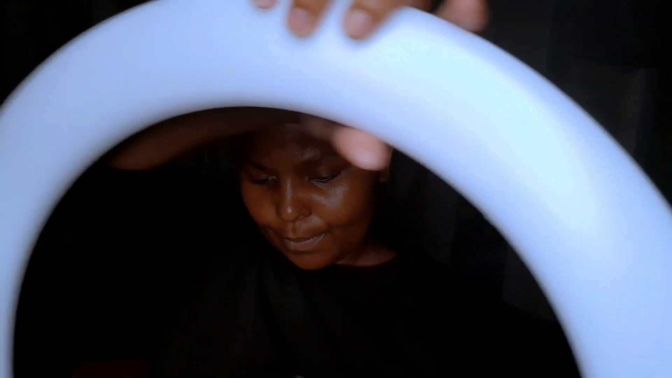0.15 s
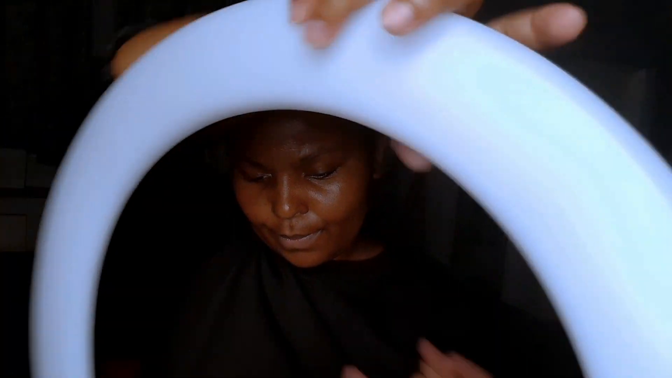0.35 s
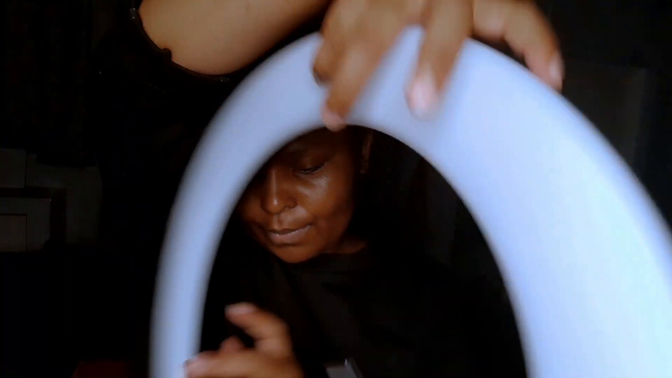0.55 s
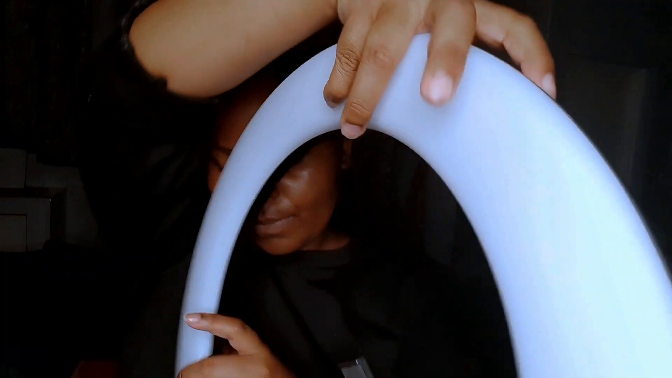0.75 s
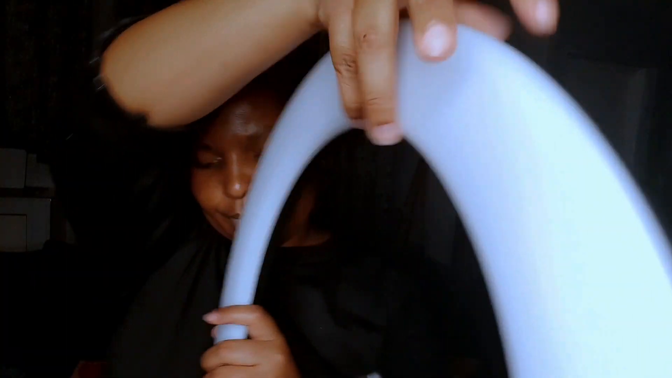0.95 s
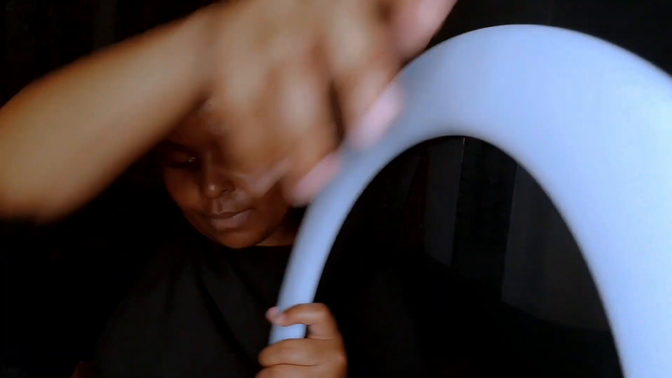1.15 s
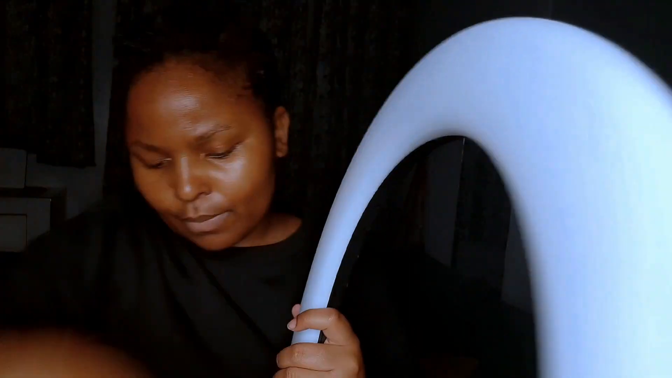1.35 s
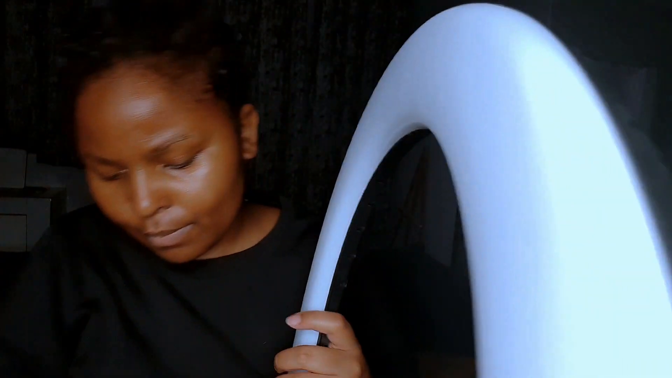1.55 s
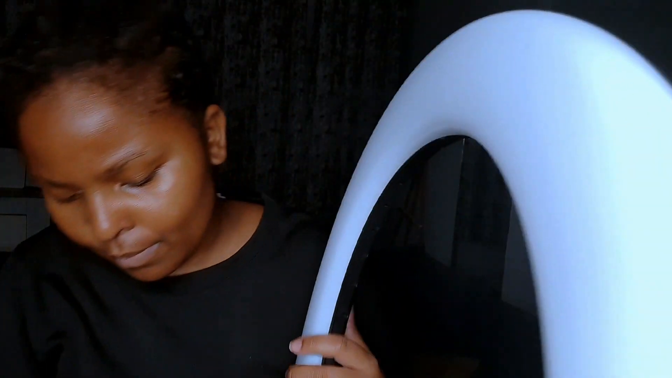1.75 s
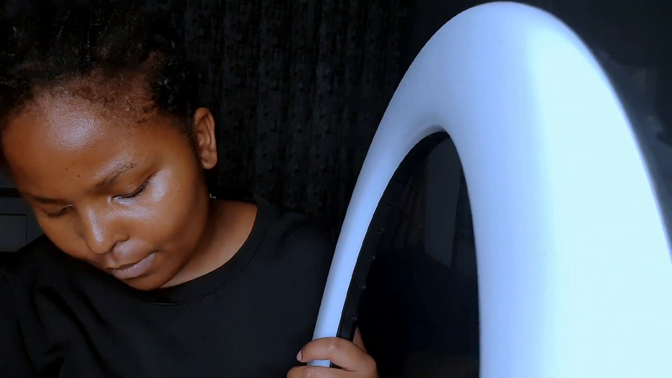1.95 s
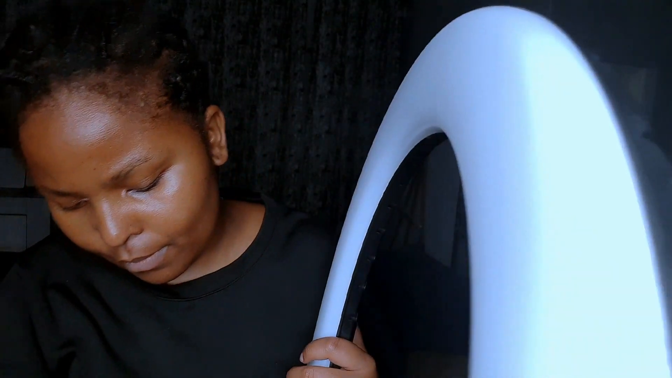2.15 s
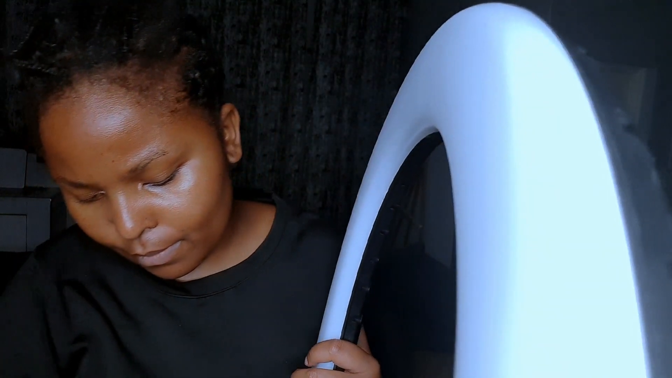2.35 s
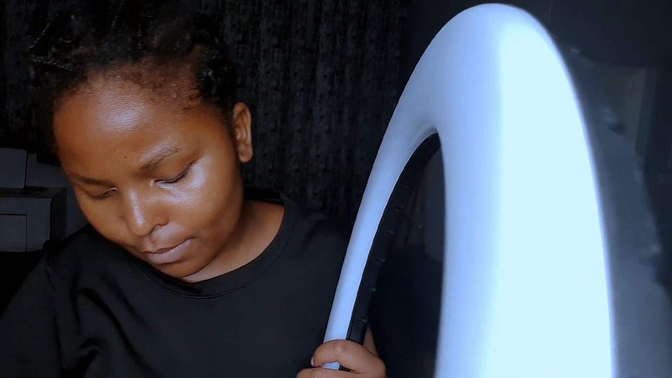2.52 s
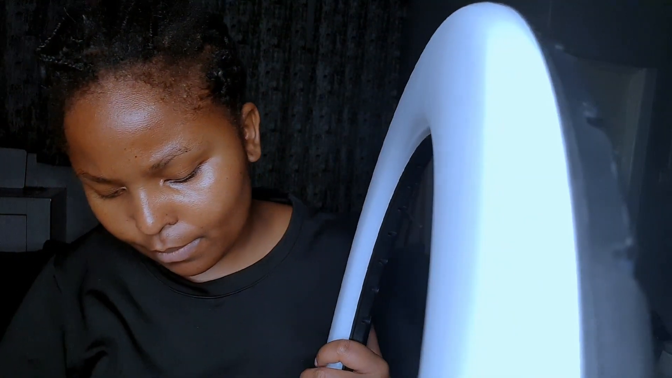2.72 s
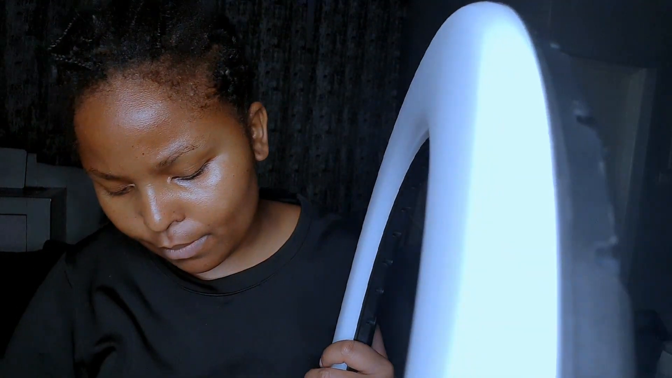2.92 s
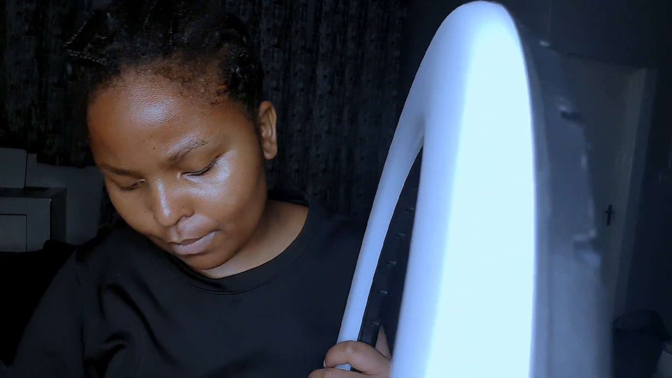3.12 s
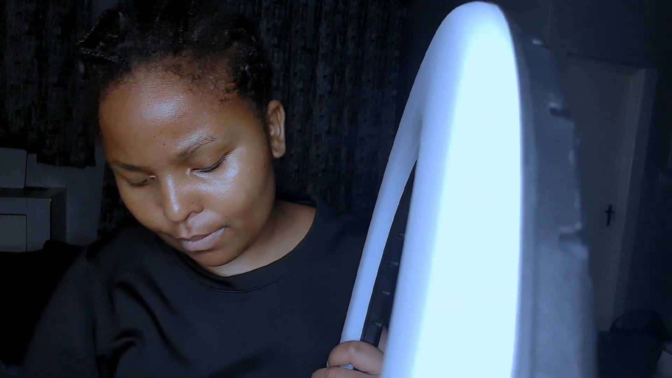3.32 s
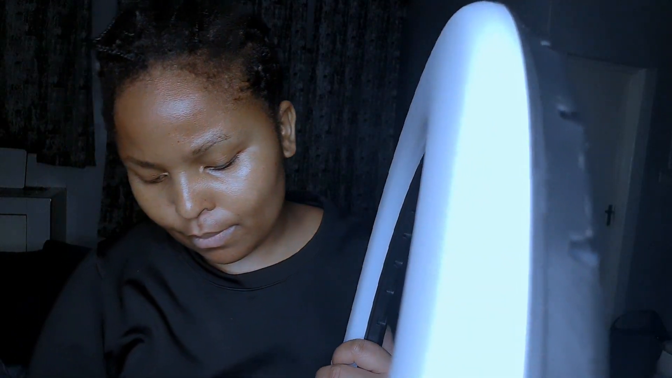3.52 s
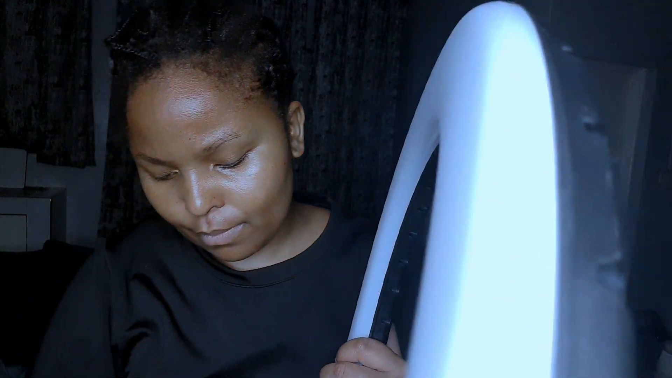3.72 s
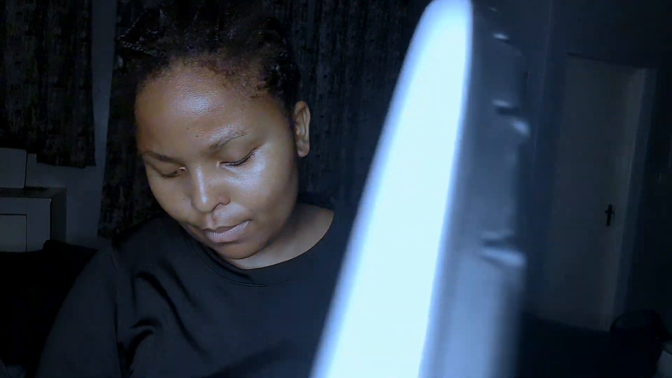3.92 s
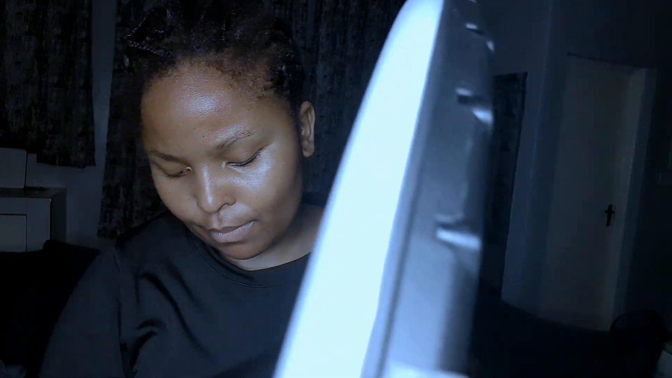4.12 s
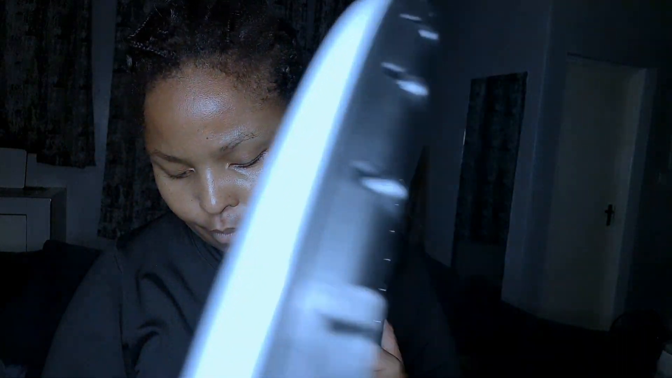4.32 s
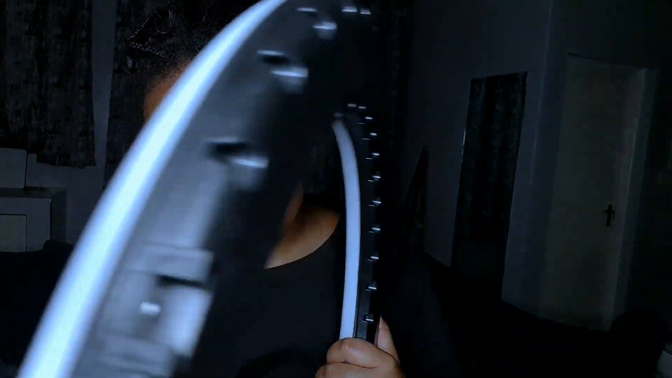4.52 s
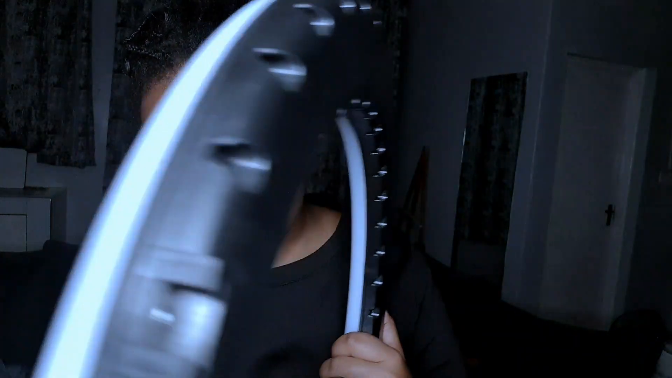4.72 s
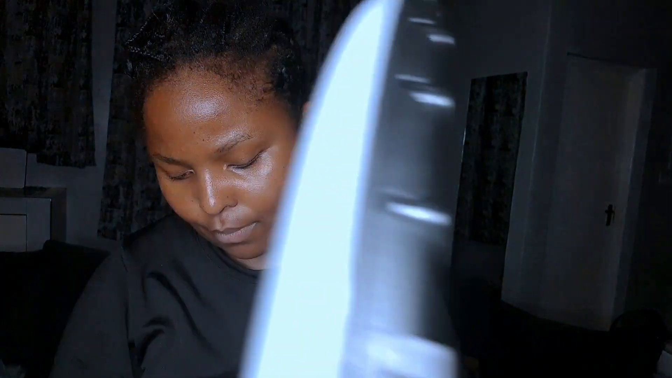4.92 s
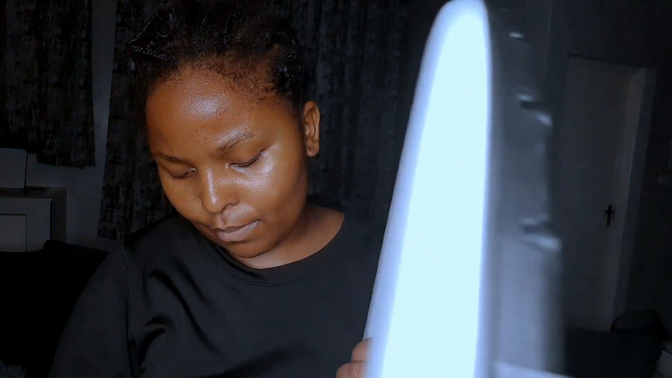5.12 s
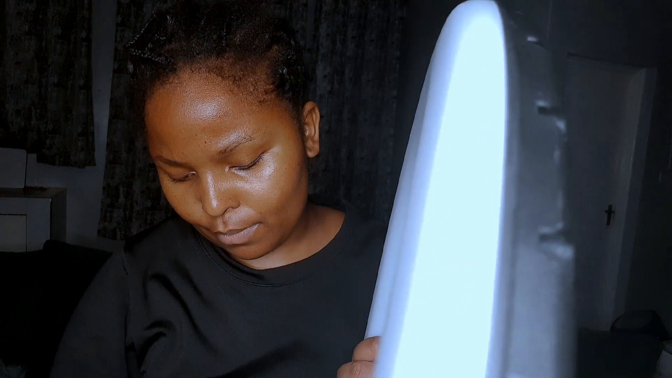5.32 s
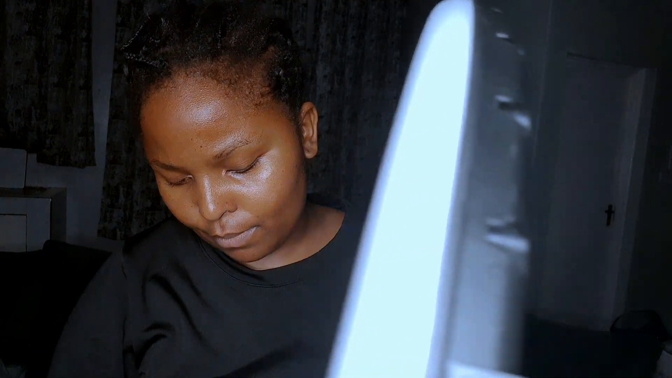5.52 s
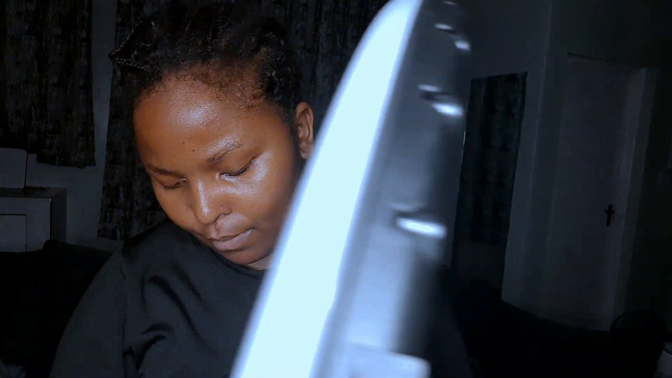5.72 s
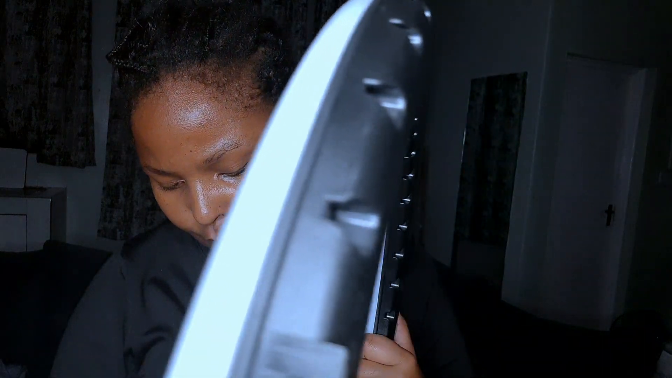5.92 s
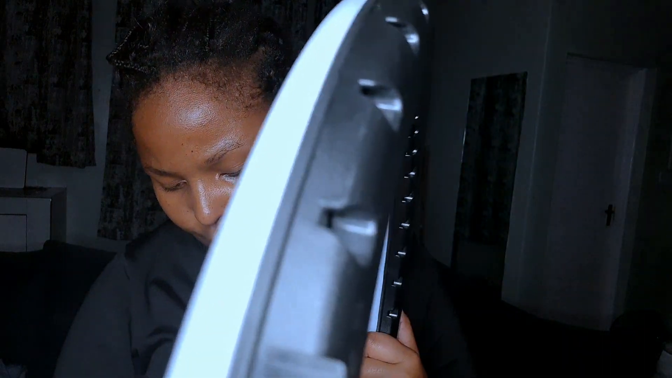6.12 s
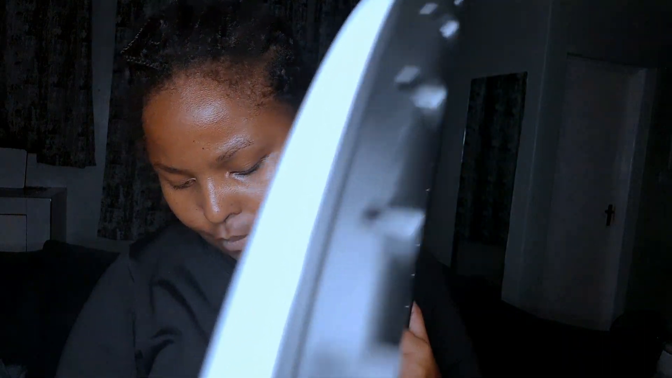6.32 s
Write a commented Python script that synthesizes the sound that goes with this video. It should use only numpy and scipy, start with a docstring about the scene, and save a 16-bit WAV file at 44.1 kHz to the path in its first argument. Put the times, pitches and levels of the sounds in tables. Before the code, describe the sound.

A light plastic hoop is handled right beside the microphone. Dry, short, hollow clicks and thuds come irregularly, with brief finger scrapes between them, thinning out after two and a half seconds. After a pause the joint ticks and the shell rattles twice, the second burst sharpest. Soft fumbling and a tiny fingertip squeak end it. Beneath lie a constant low mains hum, soft hiss and a very faint high whine.

```python
"""Knocks and rattles: a plastic ring light is gripped and swivelled on its stand in a small room.
Each contact rings the hollow housing's modes plus a dense noise clatter, shaped by hardness in four bands.
Fingers rub and creak over the shell (trains of tiny jerks), the joint ticks (decaying tones) and a
fingertip squeaks (coloured noise). Underneath: a two-tone mains hum; whine, rumble and hiss as noise."""
import sys
import numpy as np
from scipy import signal
from scipy.fft import rfft, irfft, next_fast_len
from scipy.io import wavfile
from scipy.ndimage import map_coordinates

SR = 44100
rng = np.random.default_rng(int(sys.argv[2]) if len(sys.argv) > 2 else 0)


def put_to_file(sound):
    """Save the sound as 16-bit audio at rate SR, in the file named by the first command-line argument."""
    columns = np.atleast_2d(sound).T  # one column per channel
    safe = np.clip(columns, -1, 1)
    whole_steps = np.round(safe * 32767)
    wavfile.write(sys.argv[1], SR, whole_steps.astype(np.int16))


N = 280564

# contacts on the housing: [t/s, relative ring level/dB, thud re ring/dB, clack re ring/dB,
# resonance of the struck spot f/Hz, hardness/0-1]
KNOCKS = [(0.039, -22, -15, -11, 650, .6), (0.0546, -16, -29, -7.5, 523, 0.07),
          (0.063, -20, -27, -25, 1030, 0.5), (0.07, -18.5, -11.5, -11, 760, 0.4),
          (0.081, -21.5, -19, -9, 1050, 0.45), (0.37, -34.5, -3.5, -34, 950, 0.2),
          (0.451, -23.5, -13, -21, 1210, 0.6), (0.495, -39.5, -6, -6, 920, 0.7),
          (0.583, -28, -15, -7.5, 2120, 1), (0.65, -23, -16, -7, 915, 0.74),
          (0.746, -34.5, -7.5, -8, 1600, 0.54), (0.76, -33, -10, -17, 650, 0.8),
          (0.929, -27, -13, -9, 1080, 0.54), (0.947, -29, -19, -5.5, 1190, 0),
          (1.108, -25, -7.5, -6, 855, 0.9), (1.139, -33, -6, -2.5, 780, 0.9),
          (1.155, -28.5, -6, -15, 680, 0.44), (1.18, -33.5, -14, -24, 540, .25),
          (1.274, -38.5, -33, -13.5, 1160, 1), (1.41, -27.5, -24, -18.5, 915, 0),
          (1.602, -37.5, -15, -8.5, 990, 0.75), (1.713, -27, -8.5, -10.5, 775, 0.52),
          (1.735, -32.5, -8.5, -10, 770, 0.54), (1.785, -36.5, -7, -17, 775, 0.4),
          (1.9, -42, -3, -13, 940, 0.6), (1.965, -29.5, -11, -13, 950, .5),
          (2.056, -31.5, -9, -18.5, 850, 1), (2.117, -39, -4, -14, 650, 0.25),
          (2.359, -35.5, -12, -12.5, 800, 0.15), (2.398, -29, -15.5, -12.5, 1440, 0.67),
          (2.469, -42, -11, -9, 1120, 0.2), (2.801, -41.5, -11, -16.5, 1100, .05),
          (3.824, -39.5, -20, -20.5, 980, 0.2), (3.85, -48, -13, -15, 1000, .3),
          (4.282, -45, -21, -9, 680, .05), (4.332, -30, -15, -19, 990, .05),
          (4.363, -22, -16, -13.5, 1180, .55), (4.384, -22.5, -12, -13, 790, 1),
          (4.4, -30.5, -7.5, -4, 910, 0.8), (4.507, -38, -22, -11, 870, 1),
          (4.846, -26.5, -31, -12, 1150, .05), (4.863, -21, -21.5, -12, 1180, 0.34),
          (4.91, -21.5, -14, -6, 1630, .25), (4.936, -25, -11.5, -4, 2130, 0.6),
          (4.954, -11.5, -22, -8, 1450, .75), (4.967, -27, -18, -7, 1080, 0.4),
          (4.986, -34.5, -28, -7.5, 1110, .1), (5.652, -49, 0, -10, 930, .3),
          (5.713, -38, -12, -5.5, 493, 0.3), (5.726, -33, -8, -13.5, 1450, .6),
          (5.883, -34.5, -10.5, -6, 1210, 0.66), (5.908, -36, -14.5, -12, 1220, 0.8)]
# slip of the creaking joint as a contact: (thud re ring/dB, clack re ring/dB, resonance f/Hz,
# hardness, 1 and above = fully hard)
CREAK_TOUCH = (-15, -7, 1800, 5)
# modes of the hollow housing: [f/Hz, relative level/dB, t60/s]
SHELL_MODES = [(130, -15.5, 0.17), (222.6, -20, 0.16), (342, -13, 0.061), (517.5, -7, 0.081),
               (650, -4, 0.082), (785, -1.5, 0.11), (926.3, -10, 0.13), (1066, -3, 0.066), (1161, 0, 0.045),
               (1398, -4, 0.039), (1789, -3.5, 0.035), (2150, -22.5, 0.092), (2950, -11, 0.061),
               (4000, -27.5, .07), (4170, -24.5, 0.11), (4970, -28.5, 0.14), (5080, -6.5, 0.021),
               (5950, -28, 0.082), (6620, -24, 0.08), (8000, -35.5, 0.092)]
# dense, quickly damped modes of the housing: [f/Hz, relative density/dB per Hz]
CLATTER_COLOUR = [(120, -17), (300, -15), (450, -7.5), (700, 1), (1150, -2.5), (1600, -10.5), (2200, -14),
                  (3300, -13.5), (5000, -20), (6000, -26.5), (8200, -27.5), (10000, -35.5), (12500, -30.5),
                  (16000, -34.5)]
# edges of the thud, ring, clack and snap bands: [f/Hz]
BAND_EDGES_HZ = [120, 400, 2000, 6000, 15900]
# shading of the right port re the left: [f/Hz, loss/dB]
RIGHT_SHADE = [(200, -1), (650, 1), (1300, 3), (3000, 2), (5200, 0.5), (7500, 13.5), (15000, 15.5)]
# left-right correlation of the handling: [f/Hz, correlation/-1 to 1]
NEAR_ALIKE = [(200, 0.9), (700, 0.46), (1400, 0.14), (2500, 0), (8000, 0.14)]
# left-right correlation of the squeak and background: [f/Hz, correlation/-1 to 1]
FAR_ALIKE = [(60, 0.27), (180, 0.42), (550, 0.074), (1650, -0.093), (4970, -0.26), (15000, -0.061)]
# decay of the room: [f/Hz, t60/s]
ROOM_DECAY = [(150, 0.66), (500, 0.37), (1000, 0.29), (2000, 0.25), (5000, 0.29), (12000, 0.28)]
# swing of the ring edge-on to the microphones: [t/s, share/0-1]
EDGE_ON = [(0, 0.4), (1.4, 0), (3.8, 0.3), (6.3, 0.72)]
# fingers and joint sliding, a row per stroke: [start t/s, length/s, relative ring level/dB, scrape re ring/dB]
STROKES = [(0.0, 0.0039, -32.5, -10), (0.378, 0.2, -37.5, -10), (0.535, 0.025, -31.5, -6.5),
           (0.727, 0.06, -32, -14), (0.853, 0.082, -41.5, -9), (0.924, 0.068, -32, -12.5),
           (1.014, 0.028, -33.5, -3), (1.097, 0.061, -27.5, -17.5), (1.192, 0.059, -39, -12),
           (1.71, 0.065, -46, -4), (1.866, 0.17, -48, -6), (2.083, 0.083, -44.5, -17),
           (2.36, 0.097, -48.5, -3.5), (2.789, 0.037, -48, -19), (5.241, 0.13, -50, -13),
           (5.685, 0.06, -44.5, -16), (5.77, 0.15, -45, -10), (6.167, 0.05, -56.5, -20)]
# swivel joint giving way: [t/s, pitch f/Hz, relative level/dB]
JOINT_TICKS = [(1.412, 2130, -48), (3.824, 2090, -52.5), (4.333, 2250, -42.5), (4.847, 2170, -36)]
# fingertip squeak envelope: [t/s, level/dB]
SQUEAK_LEVEL = [(5.76, -90), (5.785, -68), (5.803, -55), (5.83, -60), (5.86, -69), (5.883, -47), (5.9, -56),
                (5.94, -57), (5.98, -78)]
# fingertip squeak spectrum: [f/Hz, relative density/dB per Hz]
SQUEAK_COLOUR = [(4800, -35), (5700, 1), (6250, 7), (6900, -19), (8200, -14), (9500, -44)]
# room rumble spectrum: [f/Hz, relative density/dB per Hz]
RUMBLE_COLOUR = [(20, -36.5), (32, -13), (45, -8), (68, 2), (90, -3.5), (130, 0), (175, -14), (260, -8.5),
                 (350, -19.5), (550, -25.5), (1200, -32), (3000, -38.5), (8000, -61.5)]
# microphone hiss spectrum: [f/Hz, relative density/dB per Hz]
HISS_COLOUR = [(300, -17), (1500, -22), (2900, 4), (4000, 2), (6200, -0.5), (7500, -1), (9500, -3),
               (11500, 3), (16000, -1)]
# electrical whine spectrum: [f/Hz, relative density/dB per Hz]
WHINE_COLOUR = [(4400, -43.5), (4850, -3.5), (5060, -10), (5160, 2.5), (5280, -8), (5450, -19),
                (5800, -21.5)]

# snap re ring where clack equals ring; dB of snap per dB of clack; snap of a fully cushioned blow
SNAP_DB, SNAP_DB_PER_CLACK_DB, DULLEST_SNAP_DB = -13.5, 1, -39
CREAK_START_S, CREAK_PERIOD_S, CREAK_RELATIVE_DB, CREAK_LOSS_DB = 0.807, 0.024, -33, 2.5
STROKE_RISE_DB_PER_S, STROKE_FALL_DB_PER_S = 600, 251
HISS_DB_PER_SCRAPE_DB = 0.98
HUM_HZ, HUM_DB, HUM_DRIFT_DB, HUM_DRIFT_KNOTS_PER_S = 100.79, -39.6, 0.25, 3
TOP_HZ = 15850  # band limit


def knocks(level_db, spot_gain, spot_q, dull_hz):
    """Soft finger blows thud, hard plastic contacts clack and snap; close runs of them rattle."""
    out = np.zeros((2, N + SR))
    t = np.arange(SR * 2 // 5) / SR
    attack = round(0.016 * SR)  # band levels are set over this span
    for start_s, db, thud_db, clack_db, spot_hz, hardness in KNOCKS + creak(count=4):
        # brighter clack, more snap
        snap_db = SNAP_DB + SNAP_DB_PER_CLACK_DB * clack_db
        shell = tap(t, start_s)
        # the panel under the contact favours its own resonance
        spot_b, spot_a = signal.iirpeak(spot_hz, spot_q, fs=SR)
        shell = shell + spot_gain * signal.lfilter(spot_b, spot_a, shell)
        # a cushioned blow with little snap hardly reaches the upper modes
        reach_hz = min(dull_hz * amp(snap_db - DULLEST_SNAP_DB), TOP_HZ)
        shell = signal.lfilter(*signal.butter(2, reach_hz, fs=SR), shell)
        onset = contact(t, hardness, crack_gain=2.5, crack_s=0.0023, squash_s=0.012)
        bands = np.array(split(shell)) * onset
        gains = amp(level_db + db + np.array([thud_db, 0, clack_db, snap_db]))
        blow = sum(gain * band / np.std(band[:, :attack]) for gain, band in zip(gains, bands))
        out[:, round(start_s * SR):][:, :len(t)] += blow
    return out[:, :N]


def creak(count):
    """The joint creaks as a run of slips, each weaker than the last, given as contacts on the housing."""
    return [(CREAK_START_S + k * CREAK_PERIOD_S, CREAK_RELATIVE_DB - k * CREAK_LOSS_DB, *CREAK_TOUCH)
            for k in range(count)]


def tap(t, time_s):
    """The housing's answer to a contact at time_s; edge-on, its panels radiate less of their low ring."""
    ring = housing(t, clatter_db=2.5, clatter_t60=0.063, scatter_db=3.5, attack_s=0.0013, lead_s=0.00025)
    edge_on = np.interp(time_s, *np.transpose(EDGE_ON))
    return ring - edge_on * lowpass(ring, corner_hz=900)


def housing(t, clatter_db, clatter_t60, scatter_db, attack_s, lead_s):
    """One tap on the shell at both microphones; each spot stirs the modes differently."""
    hz, db, t60 = np.transpose(SHELL_MODES)[:, :, None]
    early = t[:SR // 8]

    def decay(life_s):
        return np.exp(-np.log(1000) * early / life_s)

    strength = amp(db + scatter_db * rng.standard_normal(hz.shape)) * rng.choice([-1, 1], hz.shape)
    modes = np.sum(strength * decay(t60) * np.sin(2 * np.pi * hz * early), axis=0)
    clatter = noise(CLATTER_COLOUR, NEAR_ALIKE, len(early)) * decay(clatter_t60)
    # the vibration takes a moment to spread round the ring
    spread = 1 - np.exp(-early / attack_s)
    ring = (unit(modes) + amp(clatter_db) * unit(clatter)) * spread
    heard = signal.fftconvolve(ring, room(t, wet_db=-1.5, build_s=0.0014), axes=1)[:, :len(t)]

    def ports(f):
        # the left port is nearer: the right one is later and shaded
        right = amp(-along(RIGHT_SHADE, f)) * np.exp(-2j * np.pi * f * lead_s)
        return np.array([np.ones_like(f), right])

    return filtered(heard, ports)


def contact(t, hardness, crack_gain, crack_s, squash_s):
    """Onset of the four bands: a hard contact cracks, a soft one lets the treble in slowly."""
    hardness = np.clip(hardness, 0, 1)
    band_delay = np.linspace(0, 1, 4)[:, None, None]
    rise_s = 1 / SR + squash_s * (1 - hardness) * band_delay
    crack = 1 + crack_gain * hardness ** 2 * np.exp(-t / crack_s)
    return (1 - np.exp(-t / rise_s)) * crack


def split(x):
    """The thud, ring, clack and snap bands of x."""
    edges = zip(BAND_EDGES_HZ, BAND_EDGES_HZ[1:])
    return [signal.sosfilt(signal.butter(3, edge, btype="band", fs=SR, output="sos"), x) for edge in edges]


def rubbing(ring_db, scrape_db, hiss_db, slip_rate, spread_db, clump_db, lean):
    """Skin and joint stick and slip: tiny jerks of uneven size drive the shell from ever new spots."""
    t = np.arange(SR // 3) / SR
    stretch = SR // 14  # samples per spot
    sizes = amp(spread_db * np.minimum(rng.exponential(size=N), 3)) * rng.choice([-1, 1], N)
    # grip pressure varies, so jerk strength swells and sinks
    pressure = amp(clump_db * wobble(70))
    slips = unit(sizes * pressure * (rng.random(N) < slip_rate / SR))
    onset = contact(t, hardness=0.69, crack_gain=3.9, crack_s=0.0032, squash_s=0.01)
    grains = np.zeros((4, 2, N + SR))
    for start in range(0, N, stretch):
        shell = tap(t, start / SR)
        # light jerks move the lowest modes less
        lean_shell = shell - lean * lowpass(shell, corner_hz=1186)
        jerk = np.array(split(lean_shell)) * onset
        jerk = jerk / np.sqrt(np.sum(jerk ** 2, axis=(1, 2), keepdims=True) / 2)
        run = signal.fftconvolve(slips[None, None, start:start + stretch], jerk, axes=2)
        grains[..., start:start + run.shape[-1]] += run
    # the thud band is left out
    layers = zip(grains[1:, :, :N], strokes(), (ring_db, scrape_db, hiss_db))
    return sum(band * gain * amp(db) for band, gain, db in layers)


def strokes():
    """Ring, scrape and hiss gains: strokes swell, hold and fade; a drier one scrapes and hisses more."""
    t = np.arange(N) / SR
    power = np.zeros((3, N))
    for start_s, length_s, db, scrape_db in STROKES:
        rise_db = STROKE_RISE_DB_PER_S * np.maximum(start_s - t, 0)
        fall_db = STROKE_FALL_DB_PER_S * np.maximum(t - start_s - length_s, 0)
        colour = amp([[0], [scrape_db], [HISS_DB_PER_SCRAPE_DB * scrape_db]])
        power += (colour * amp(db - np.minimum(rise_db + fall_db, 100))) ** 2
    return np.sqrt(power)


def joint(t60, overtone, overtone_db):
    """The stiff joint lets go with a short, pitched tick of two decaying partials."""
    out = np.zeros((2, N + SR))
    t = np.arange(SR // 3) / SR
    for start_s, hz, db in JOINT_TICKS:
        phase = 2 * np.pi * hz * t
        tone = np.sin(phase) + amp(overtone_db) * np.sin(overtone * phase)
        tick = tone * np.exp(-np.log(1000) * t / t60)
        heard = signal.fftconvolve(tick[None], room(t, wet_db=10.5, build_s=0.0077), axes=1)[:, :len(t)]
        out[:, round(start_s * SR):][:, :len(t)] += 2 * amp(db) * heard
    return out[:, :N]


def squeak(grain_db):
    """A dry fingertip slides over smooth plastic: a thin, uneven swish of coloured noise."""
    level_db = np.interp(np.arange(N) / SR, *np.transpose(SQUEAK_LEVEL), left=-200, right=-200)
    return amp(level_db + grain_db * wobble(120)) * noise(SQUEAK_COLOUR, FAR_ALIKE, N)


def room(t, wet_db, build_s):
    """The direct sound and a fresh diffuse tail whose decay time depends on frequency."""
    white = noise([(1000, 0)], NEAR_ALIKE, len(t))
    hz, lag_s, spectrum = signal.stft(white, SR, nperseg=256)
    decay = amp(-60 * lag_s / along(ROOM_DECAY, hz)[:, None])
    tail = signal.istft(spectrum * decay, SR)[1][:, :len(t)]
    tail = tail * (1 - np.exp(-t / build_s))
    direct = t == 0
    return amp(wet_db) * tail / np.linalg.norm(tail[0]) + direct


def hum(octave_db):
    """Twice the mains frequency, drifting slightly in level, with a weak steady octave."""
    phase = 2 * np.pi * HUM_HZ * np.arange(N) / SR
    fundamental = amp(HUM_DB + HUM_DRIFT_DB * wobble(HUM_DRIFT_KNOTS_PER_S)) * np.sin(phase)
    octave = amp(octave_db) * np.sin(2 * phase)
    return np.sqrt(2) * (fundamental + octave) * amp([[-0.3], [0.3]])


def background(rumble_db, hiss_db, whine_db):
    """Room rumble, microphone hiss and a narrow, fuzzy electrical whine, all coloured noise."""
    rumble = amp(rumble_db + 0.27 * wobble(2.2)) * noise(RUMBLE_COLOUR, FAR_ALIKE, N) * amp([[0.7], [-0.7]])
    whine = amp(whine_db + 0.4 * wobble(6)) * noise(WHINE_COLOUR, FAR_ALIKE, N)
    hiss = amp(hiss_db) * noise(HISS_COLOUR, FAR_ALIKE, N)
    return rumble + whine + hiss


def noise(spectrum, alike, size):
    """Stereo noise of rms 1 with a given colour and left-right correlation."""
    def gains(hz):
        angle = np.arccos(np.clip(along(alike, hz), -1, 1)) / 2
        return amp(along(spectrum, hz)) * np.array([np.cos(angle), np.sin(angle)])

    mid, side = filtered(rng.standard_normal((2, size)), gains)
    return unit(np.array([mid + side, mid - side]))


def filtered(x, response):
    """x times a response of frequency."""
    n = x.shape[-1]
    padded = next_fast_len(n + 2048, True)
    spectrum = rfft(x, padded) * response(np.fft.rfftfreq(padded, 1 / SR))
    return irfft(spectrum, padded)[..., :n]


def lowpass(x, corner_hz):
    """A gentle one-pole low-pass."""
    return signal.lfilter(*signal.butter(1, corner_hz, fs=SR), x)


def wobble(knots_per_s):
    """A smooth random curve through normally distributed knots."""
    knots = rng.standard_normal(int(N * knots_per_s / SR) + 4)
    return map_coordinates(knots, [np.arange(N) * knots_per_s / SR])


def along(points, hz):
    """(f/Hz, value) points read on a log frequency axis."""
    f, value = np.transpose(points)
    return np.interp(np.log(hz + 1), np.log(f + 1), value)


def amp(db):
    """Decibels to gain."""
    return 10 ** (np.asarray(db) / 20)


def unit(x):
    """x at rms 1."""
    return x / np.sqrt(np.mean(x ** 2) + 1e-20)


def scene():
    """The handling over the steady sounds of the room."""
    blows = knocks(level_db=-2.86, spot_gain=1.73, spot_q=5.4, dull_hz=2500)
    ticks = joint(t60=0.021, overtone=1.3, overtone_db=-9)
    sliding = rubbing(ring_db=-3.0, scrape_db=-1.5, hiss_db=-11, slip_rate=300,
                      spread_db=4, clump_db=2, lean=0.4)
    handling = blows + ticks + sliding + squeak(grain_db=3.0)
    steady = hum(octave_db=-66) + background(rumble_db=-47.5, hiss_db=-67.5, whine_db=-65.5)
    return handling + steady


def record(dry):
    """The microphone rounds off the very highest peaks; nothing passes above the band limit."""
    ceiling = 0.8
    rounded = dry / (1 + np.abs(dry / ceiling) ** 4) ** (1 / 4)
    return filtered(rounded, lambda hz: hz < TOP_HZ)


dry = scene()
out = record(dry)
put_to_file(out)
```